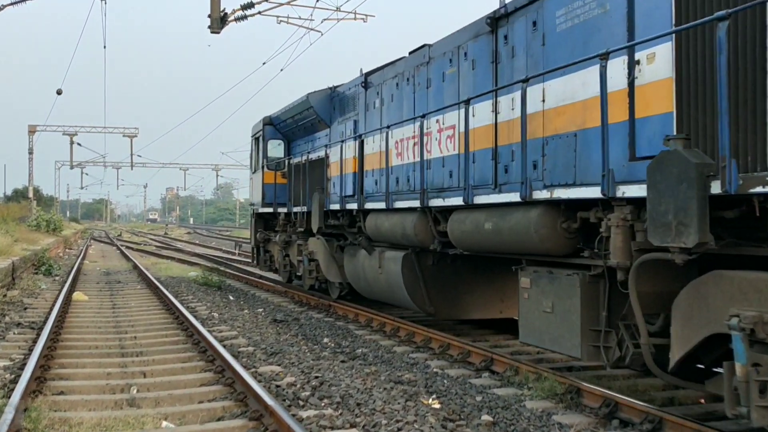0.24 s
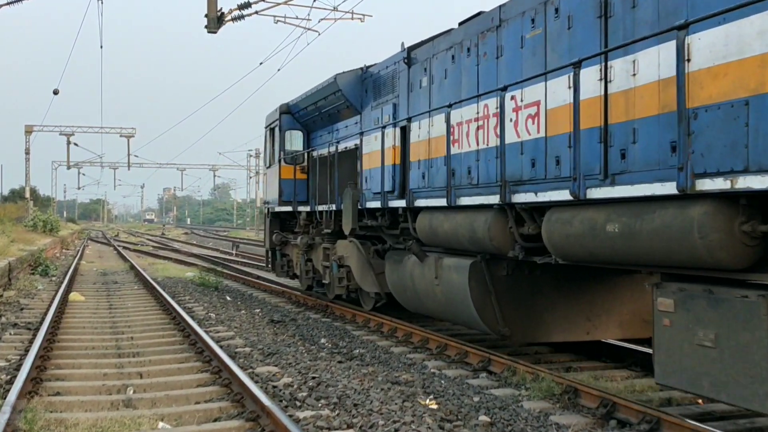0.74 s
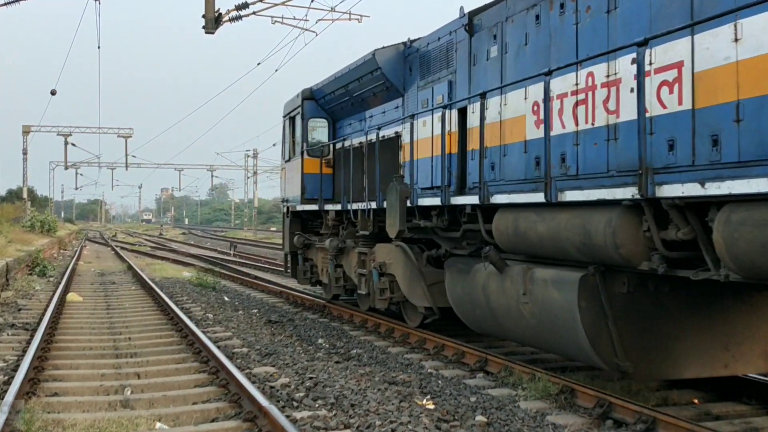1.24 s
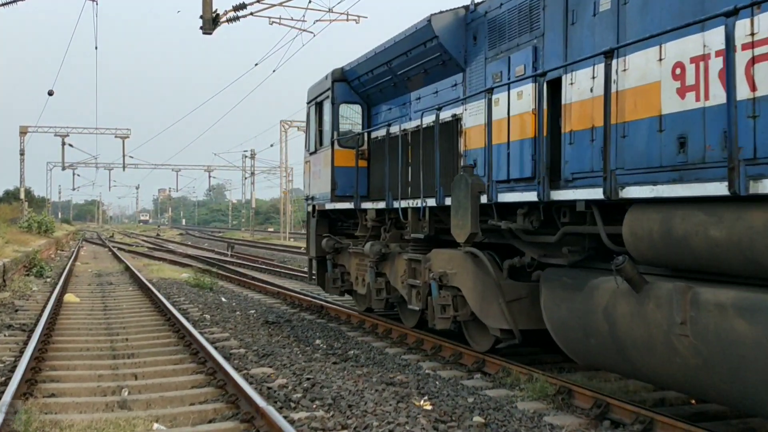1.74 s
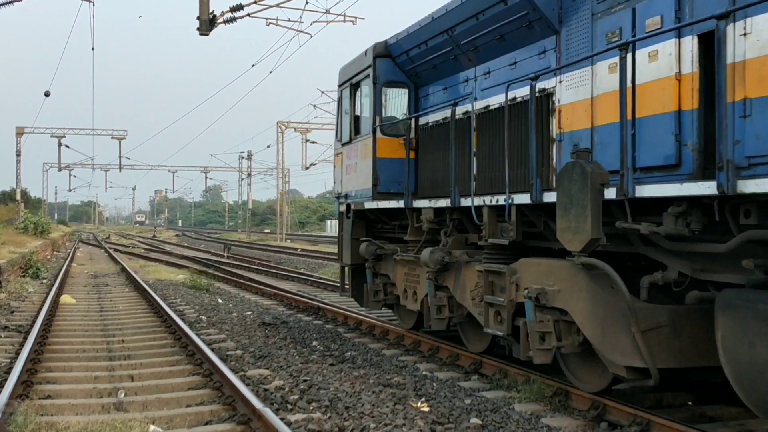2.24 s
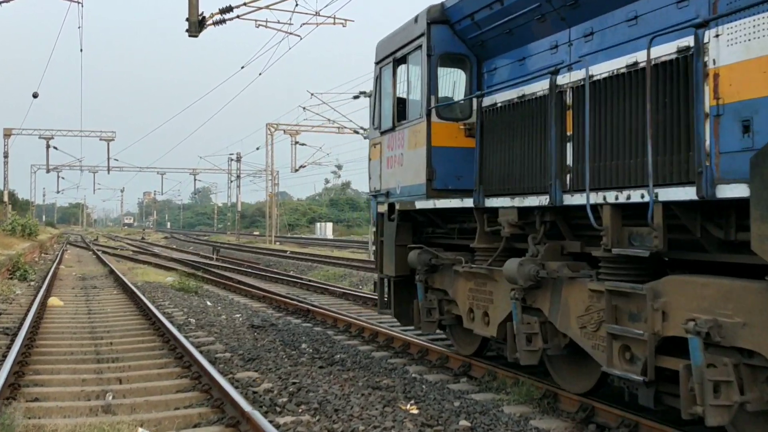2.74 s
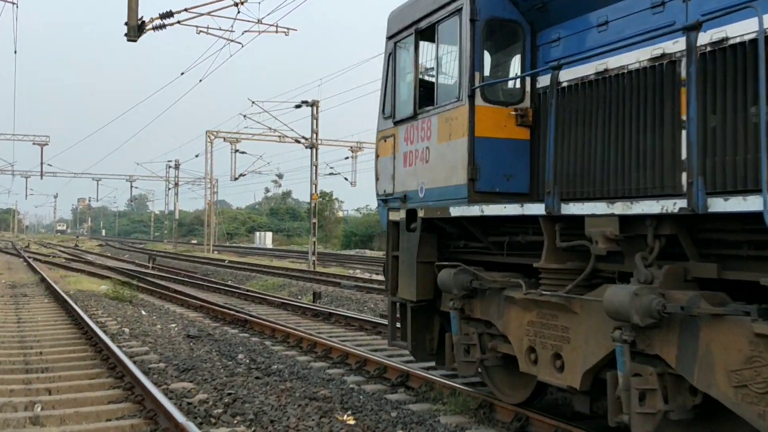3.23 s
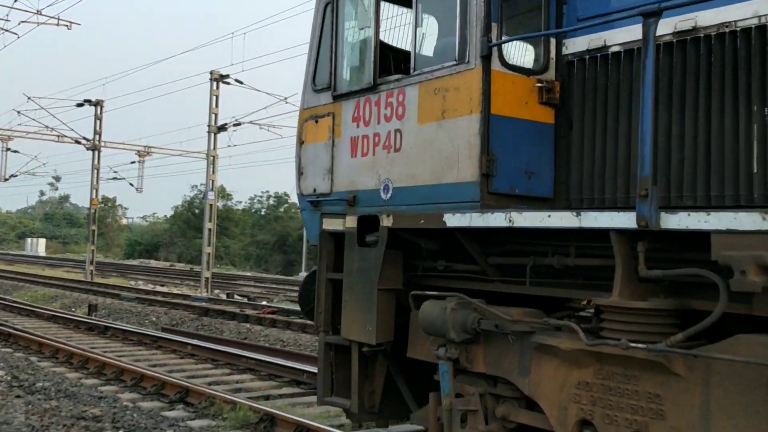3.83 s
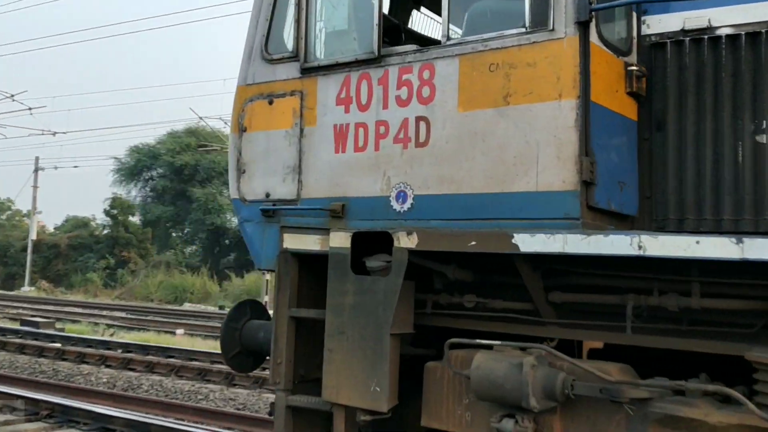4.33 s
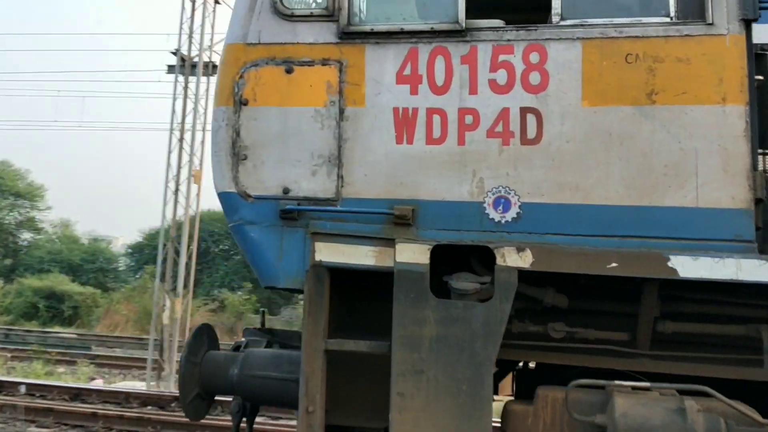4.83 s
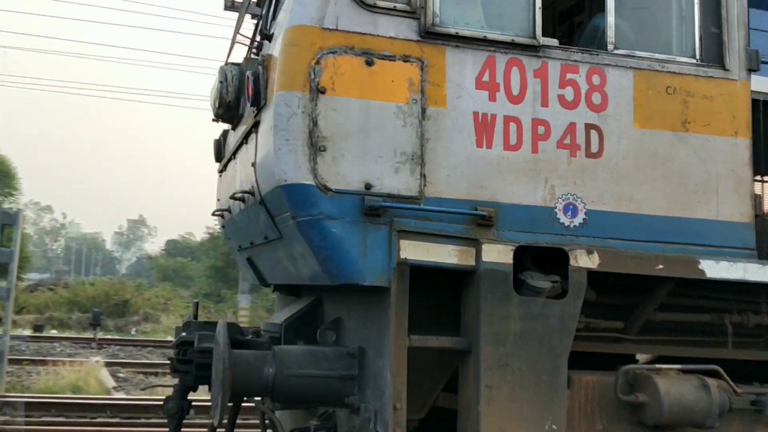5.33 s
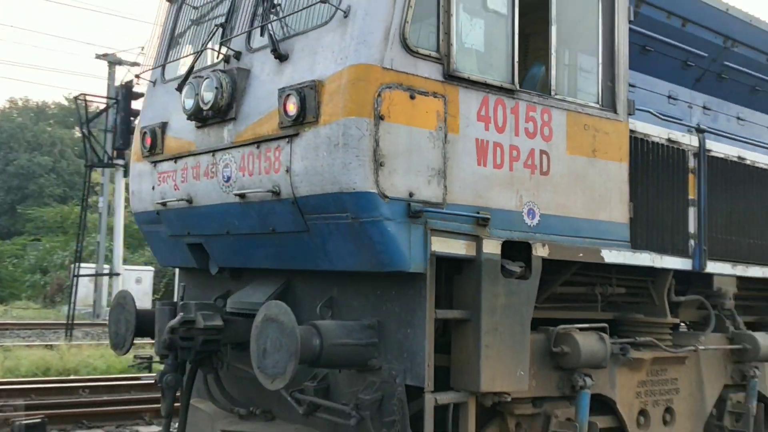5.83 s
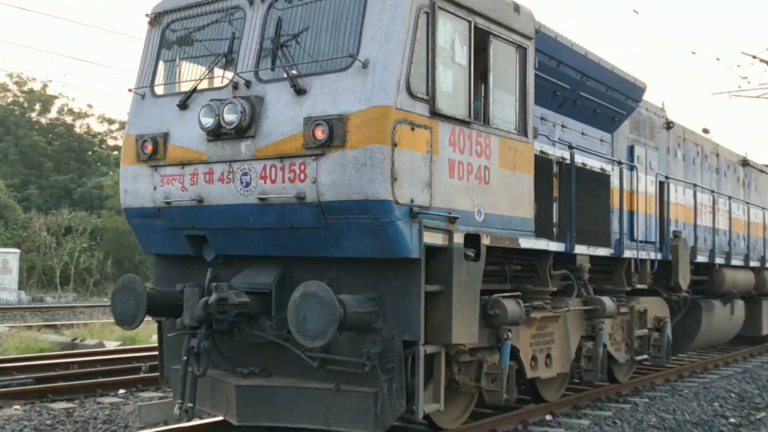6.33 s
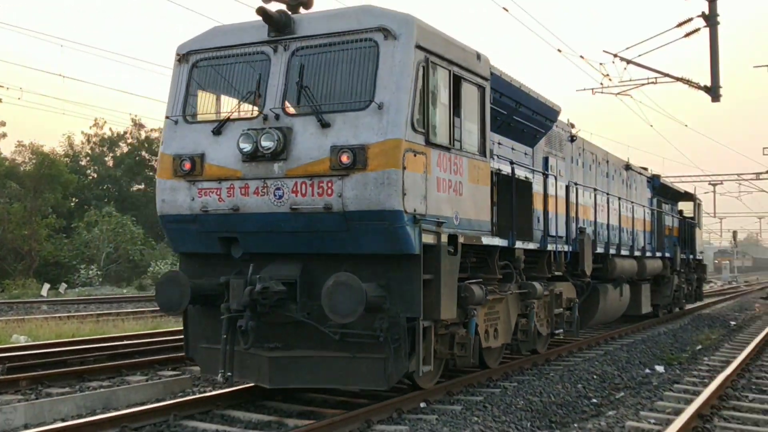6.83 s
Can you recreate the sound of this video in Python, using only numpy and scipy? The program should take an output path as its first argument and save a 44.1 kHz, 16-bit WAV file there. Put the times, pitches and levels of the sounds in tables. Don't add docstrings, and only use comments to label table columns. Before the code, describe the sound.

A loud two-note air horn is already sounding and stops after about half a second with a puff of air and yard echoes. A heavy diesel locomotive then rolls slowly past a close hand-held stereo microphone outdoors: throbbing exhaust, droning casing, high turbo whine and broad fan roar, strongest around two to three seconds. Wheels thud over a rail joint in two groups, then everything dulls and recedes.

```python
import sys
import numpy as np
from scipy import signal
from scipy.fft import rfft, irfft, next_fast_len
from scipy.io import wavfile
from scipy.ndimage import uniform_filter1d, map_coordinates

SR = 44100
rng = np.random.default_rng(int(sys.argv[2]) if len(sys.argv) > 2 else 0)


def ratio_of_db(decibels):
    return 10 ** (np.asarray(decibels, float) / 20)


def to_wav(s):
    ch = np.atleast_2d(s).T
    pcm = np.round(np.clip(ch, -1, 1) * 32767)
    wavfile.write(sys.argv[1], SR, pcm.astype(np.int16))


N = 311787

# time in seconds, level in dB.
BLOW = [
    (0, 5),
    (.5, -1),
    (.56, -4),
    (.66, -7.5),
    (.72, -30),
]
# time in seconds,
# fundamental in Hz.
LOW_HZ = [(0, 270.4), (.3, 270), (.5, 270.3), (.6, 273), (.72, 274)]
HIGH_HZ = [(0, 466.5), (.3, 465.8), (.5, 466), (.66, 468.5)]
LOW_TOP_DB = [-22.5, -21, -31.5, -32, -33, -35, -40.5, -58.5, -68.5, -52, -49, -57, -58, -68]
HIGH_TOP_DB = [-26.5, -27, -42, -38.5, -49, -48.5, -56, -58.5, -51.5, -49, -65.5, -50, -51]
# time in seconds, crankshaft turns per second.
SHAFT = [(0, 4.505), (1, 4.508), (2, 4.519), (3.3, 4.519), (4.5, 4.51), (7.07, 4.489)]
LOW_DROP = 2.44


def evened(x):
    return x / np.sqrt(np.mean(x ** 2) + 1e-20)


def read(points, hz):
    f, value = np.transpose(points)
    return np.interp(np.log(hz + 1), np.log(f + 1), value)


def curves(rows, t):
    s, *columns = np.transpose(rows)
    return [np.interp(t, s, c) for c in columns]


def drift(top_hz, count, size=N):
    low_pass = signal.butter(2, top_hz / 200)
    slow = signal.lfilter(*low_pass, rng.standard_normal((count, 3000)))
    at = np.arange(size) / SR * 400 + 100
    return np.array([np.interp(at, np.arange(len(row)), evened(row)) for row in slow])


def nulls(t, rows):
    return -sum(db * np.exp(-((t - s) / half) ** 2) for s, half, db in rows)


def abreast(t, db, from_s, until_s, approach_s, retreat_s):
    before = np.maximum(from_s - t, 0) / approach_s
    after = np.maximum(t - until_s, 0) / retreat_s
    return db - 10 * np.log10(1 + before ** 2 + after ** 2)


def duck_db(t):
    return -5.5 * np.clip(1 - (t - 0.547) / 0.1, 0, 1)


def ports(x):
    # time in seconds, delay in milliseconds.
    lag = [(0, 0.2965), (.9, 0.2866), (1.7, 0.256), (2.1, 0.3168), (4.9, 0.3408), (5.4, 0.095),
           (7.07, 0.053)]
    t = np.arange(N)
    late = curves(lag, t / SR)[0] * SR / 1000
    return np.array([x[0], map_coordinates(x[1], [t - late], order=3, mode="nearest")])


def hiss(level_db, patchy_db, size=1024, count=N):
    # frequency in Hz, likeness of the two ports from 0 to 1.
    likeness = [(60, 0.946), (200, 1), (600, 0.935), (1400, 0.418), (3000, 0.37), (6000, 0.062),
                (15000, .2)]
    t = np.arange(4 * count // size + 5) * size / 4 / SR
    hz = np.fft.rfftfreq(size, 1 / SR)[:, None]
    a, b, c, d, patches = rng.standard_normal((len(t), len(hz), 5)).T
    patches = uniform_filter1d(patches, size=12, axis=0)
    patches = evened(uniform_filter1d(patches, size=12, axis=1))
    same = np.clip(read(likeness, hz), 0, 1)
    left = a + 1j * b
    right = same * left + np.sqrt(1 - same ** 2) * (c + 1j * d)
    z = np.array([left, right]) * ratio_of_db(level_db(hz, t) + patchy_db * patches)
    out = signal.istft(z, nperseg=size, noverlap=size - size // 4)[1][:, :count]
    return np.pad(out, ((0, 0), (0, N - count)))


def band_db(points, hz, lo_hz, hi_hz):
    db = read(points, hz)
    inside = (hz > lo_hz) & (hz < hi_hz)
    return db - 10 * np.log10(np.sum(ratio_of_db(2 * db[inside])))


def yard(x):
    # frequency in Hz, decay time (t60) in seconds.
    decay = [(250, 1.11), (500, 0.705), (1000, 0.55), (2000, 1.3), (5000, 2.16)]
    taps = np.zeros((2, 2 * SR))
    at = np.arange(1500, 2 * SR - 20, 20) + rng.integers(0, 20, (2, (2 * SR - 1501) // 20))
    np.put_along_axis(taps, at, rng.choice([-1., 1.], at.shape), 1)
    hz, t, z = signal.stft(taps, SR, nperseg=256)
    fade_db = -60 * t / read(decay, hz)[:, None]
    tail = signal.istft(z * ratio_of_db(fade_db), SR, nperseg=256)[1]
    echoes = signal.fftconvolve(x[:, :SR], tail / np.linalg.norm(tail[0]), axes=1)
    return np.pad(echoes, ((0, 0), (0, N - echoes.shape[1])))


def bell(rows, pitch, top_db, dips, flutter_db, quiver, skew):
    n = round(rows[-1][0] * SR)
    t = np.arange(n) / SR
    first_db, pan_db = curves(rows, t)
    blow_db = curves(BLOW, t)[0]
    turns = np.cumsum(curves(pitch, t)[0]) / SR
    turns = turns + quiver * drift(12, count=1, size=n)[0] / 100
    low = [db + LOW_DROP * np.minimum(blow_db, 0) for db in top_db[:2]]
    high = [db + blow_db for db in top_db[2:]]
    out = np.zeros((2, N))
    for k, db in enumerate([first_db] + low + high, 1):
        db = db + nulls(t, [row[1:] for row in dips if round(row[0]) == k])
        waver = drift(8.1, count=4, size=n) * min(k / 4, 1)
        side_db = [[.5], [-.5]] * pan_db * (k == 1)
        phase = rng.random() - np.c_[[0, skew]] * (k == 1)
        angle = 2 * np.pi * (k * turns + phase) + .5 * waver[2:]
        out[:, :n] += ratio_of_db(db + 3.5 + side_db + flutter_db * waver[:2]) * np.sin(angle)
    out[:, :n] *= np.clip((t[-1] - t) / 0.025, 0, 1)
    return out


def horn():
    # time in seconds, fundamental in dB, left-right difference in dB.
    low_rows = [(0, -20.5, .5), (.2, -22, -4.5), (.27, -20.5, -3), (.36, -16.5, -2), (.45, -21.5, 2),
                (.53, -24.5, -0.5), (.64, -32, -2), (.69, -34, 2.5), (.72, -50, 0.5)]
    high_rows = [(0, -17, 6.7), (.12, -21.5, 7.1), (.22, -16, 1.24), (.33, -26, 10.8), (.38, -30, 2.04),
                 (.48, -18, 0.98), (.59, -21, 4.4), (.63, -32.5, 2.9), (.66, -55, 3)]
    # partial number, time in seconds, half width in seconds, depth in
    # dB.
    low_dips = [(2, 0.018, 0.11, 15.5), (2, 0.253, 0.052, 15), (3, .28, 0.044, 2.5), (3, .42, 0.0124, 6)]
    high_dips = [(2, 0.059, .03, 6), (2, 0.356, 0.076, 5), (2, 0.93, 0.026, 13), (3, 0.39, 0.069, 12)]
    bells = bell(low_rows, LOW_HZ, LOW_TOP_DB, low_dips, flutter_db=2.5, quiver=0.47, skew=0.034)
    bells = bells + bell(high_rows, HIGH_HZ, HIGH_TOP_DB, high_dips, flutter_db=3.0, quiver=0.55, skew=0.0)
    return bells + ratio_of_db(-9) * yard(bells)


def horn_air():
    # frequency in Hz, level in dB per Hz.
    puff_tone = [(2060, -36), (3500, -1.5), (4050, -41.5), (4260, -11), (5050, 1.5), (9850, -14),
                 (10700, -20), (13900, -4), (15800, -13.5)]
    rush_tone = [(900, -5.5), (2500, 0.5), (4000, -13), (6000, 2), (7200, -13.5), (9000, -36)]

    def air_db(hz, t):
        late = t - 0.4966
        swell_db = np.where(late < 0, -40 * (late / 0.044) ** 2, -269 * late)
        puff_db = np.maximum(-28 + swell_db, -73)
        late = t - 0.444
        rush_db = -33 + np.minimum(11.5 * late, -35 * late)
        spent_db = -380 * np.maximum(t - .8, 0)
        puff_db = puff_db + spent_db
        rush_db = np.maximum(rush_db + spent_db, -200)
        puff = ratio_of_db(2 * (band_db(puff_tone, hz, 9500, 16200) + puff_db + 2.0))
        rush = ratio_of_db(2 * (band_db(rush_tone, hz, 4500, 7500) + rush_db - 0.5))
        return 10 * np.log10(puff + rush)
    return hiss(air_db, patchy_db=2.0, size=256, count=SR)


def ahead():
    # multiple of the low bell, multiple of the high bell, level in dB.
    mixed = [(-1, 2, -39), (1, 1, -43.5), (2, 1, -43), (1, 2, -46.5), (3, 1, -53), (4, 1, -51.5)]
    doppler = 1.0135
    n = 3 * SR // 2
    t = np.arange(n) / SR
    low_hz, high_hz = LOW_HZ[1][1], HIGH_HZ[1][1]
    fade_db = -1.5 - 30.5 * np.maximum(t - 0.632, 0)
    tones = []
    for hz, top_db in ((low_hz, LOW_TOP_DB), (high_hz, HIGH_TOP_DB)):
        for k, db in enumerate(top_db, 2):
            if k * hz < 3000:
                thin_db = -10 * np.log10(1 + (2390 / (k * hz)) ** 4)
                tones.append((doppler * k * hz, db + fade_db + thin_db))
    fail_db = LOW_DROP * np.minimum(curves(BLOW, t)[0], 0)
    tones += [(round(a) * low_hz + round(b) * high_hz, db + fail_db) for a, b, db in mixed]
    out = np.zeros((2, N))
    for hz, db in tones:
        waver = drift(4.87, count=4, size=n)
        angle = 2 * np.pi * (hz * t + rng.random()) + .5 * waver[2:]
        out[:, :n] += ratio_of_db(db + 4 + 2.0 * waver[:2]) * np.sin(angle)
    return out


def joints():
    # start in seconds, thud in dB, thud pitch in Hz, thud t60 in seconds, rattle in dB.
    impacts = [(0.698, -26, 150.8, 0.15, -58), (0.718, -25.5, 333.8, 0.203, -36),
               (0.735, -26.5, 260.7, 0.185, -54), (1.201, -25.5, 123.5, 0.11, -32.5),
               (1.698, -16.5, 105.5, 0.076, -35), (1.741, -21, 171, 0.068, -54),
               (4.226, -17.5, 243, 0.094, -51), (4.241, -13, 226, 0.058, -38), (4.297, -13, 114, 0.05, -57),
               (4.725, -32, 178, 0.098, -36), (4.745, -20, 186.6, 0.113, -39),
               (4.766, -19, 95.4, 0.206, -56.5), (4.795, -25, 172.3, 0.224, -41),
               (4.8, -22, 87.9, 0.247, -59), (5.068, -24, 112.9, 0.192, -44.5),
               (5.222, -21.5, 94.5, 0.135, -31.5), (5.246, -13.5, 187, 0.05, -37.5),
               (5.258, -17, 274.8, 0.139, -37.5), (5.868, -39.5, 156, 0.13, -49.5)]
    # frequency in Hz, level in dB, t60 in seconds.
    modes = [(736.7, 13.5, 0.111), (880.5, 12.5, 0.086), (1142, -8.5, 0.16), (1333, -6.5, 0.86),
             (1850, -11.5, 0.088), (2160, -2, 0.1)]
    t = np.arange(SR // 2) / SR
    out = np.zeros((2, N))
    grit = signal.butter(2, [650, 2100], "bandpass", fs=SR)
    rattles = signal.lfilter(*grit, rng.standard_normal((len(impacts), 3, len(t))))
    for (s, thud_db, hz, t60, rattle_db), noise in zip(impacts, rattles):
        ring_db = rattle_db + (-6.5 if s > 3 else -27)
        body = np.sin(2 * np.pi * hz * t) + 0.182 * np.sin(2 * np.pi * 2.0 * hz * t)
        thud = ratio_of_db(thud_db - 60 * t / t60) * body
        rattle = ratio_of_db(rattle_db - 60 * (t / .12) ** 2) * evened(noise[0] + .7 * noise[1:])
        ring = sum(ratio_of_db(ring_db + db - 60 * t / ring_t60) * np.sin(2 * np.pi * f * t)
                   for f, db, ring_t60 in modes)
        hit = np.clip(t / 0.00306, 0, 1) * thud + np.clip(t / 0.0018, 0, 1) * rattle + ring
        spot = out[:, round(s * SR):][:, :len(t)]
        spot += hit
    return out


def whine(hz, db, flutter_db, flutter_hz, fuzz):
    waver = drift(flutter_hz, count=5)
    angle = 2 * np.pi * np.cumsum(hz) / SR + fuzz * waver[4] + .5 * waver[2:4]
    return ratio_of_db(db + 4.0 + flutter_db * waver[:2]) * np.sin(angle)


def rotors():
    # time in seconds, turbocharger in Hz, gear mesh in Hz, blower in Hz.
    speeds = [(0, 2538, 357, 3995), (1.5, 2547, 358, 3995), (3.8, 2563, 358, 3992),
              (5.2, 2558, 355.5, 3980), (7.07, 2554, 355, 3978)]
    # time in seconds, turbocharger level in dB.
    turbo_level = [(0, -45), (.7, -42), (1.5, -41), (1.61, -29.5), (1.72, -43.5), (2.05, -33.5), (2.6, -40),
                   (2.93, -37), (3.9, -41.5), (4.45, -44), (4.7, -41.5), (4.85, -59.5), (5.18, -48),
                   (5.9, -58.5), (6.15, -56), (7.07, -54.5)]
    # time in seconds, half width in seconds, depth in dB.
    turbo_dips = [(1.14, 0.03, 12.5), (1.3, 0.015, 8.5), (2.22, 0.019, 15.5), (2.51, 0.012, 11),
                  (2.7, 0.0285, 27), (2.79, 0.0294, 21.5), (3.06, 0.0193, 6.5), (4.13, 0.076, 12.5),
                  (4.33, 0.051, 14), (4.56, 0.0424, 14.5), (5.75, 0.045, 15.5), (6.02, 0.061, 3)]
    # multiple of the mesh, level in dB, abreast from and until in seconds.
    gears = [(2, -38, 1.605, 2.444), (2, -49, 6.06, 6.02), (3, -59.5, 6, 10), (4, -54, 6.5, 5.8),
             (6, -57.5, 5.75, 5.36)]
    # level in dB, abreast from, until, approach and retreat in seconds.
    blower_pass = (-55.5, 0.5, 5.5, -0.5, -5.5)
    upper_pass = (-53, 7, 7.5, -0.45, .5)
    t = np.arange(N) / SR
    turbo_hz, mesh_hz, blower_hz = curves(speeds, t)
    turns = np.cumsum(curves(SHAFT, t)[0]) / SR
    wobble_hz = 10.6 * np.cos(2 * np.pi * (turns + .36))
    turbo_db = curves(turbo_level, t)[0] + nulls(t, turbo_dips)
    out = whine(turbo_hz + wobble_hz, turbo_db, flutter_db=2.5, flutter_hz=16.9, fuzz=0.15)
    for k, *row in gears:
        gear_db = abreast(t, *row, approach_s=0.35, retreat_s=0.42)
        out += whine(round(k) * mesh_hz, gear_db, flutter_db=4.0, flutter_hz=10.05, fuzz=0.857)
    blower_db = abreast(t, *blower_pass) - 3.5 + nulls(t, [(4.0, 0.34, 6.2), (5.05, 0.26, 5.7)])
    out += whine(blower_hz, blower_db, flutter_db=2.5, flutter_hz=4.9, fuzz=0.94)
    upper_db = abreast(t, *upper_pass) - 11.5
    out += whine(np.full(N, 4865.), upper_db, flutter_db=6.5, flutter_hz=25, fuzz=1.0)
    return out


def roar():
    # frequency in Hz, level in dB per Hz.
    near = [(25, -32), (60, -18.5), (150, -10.5), (300, -14), (520, -13.5), (860, -19.5), (1340, -20),
            (2200, -20.5), (2900, -24.5), (4150, -34), (5100, -20), (8000, -40.5), (11500, -58),
            (14600, -43)]
    far = [(25, -8.5), (60, -31), (150, -9), (300, -13), (470, -16), (950, -23), (1380, -21), (1700, -28.5),
           (2100, -24), (4200, -40), (5200, -33), (7500, -48), (11800, -74.5), (14600, -60.5)]
    # level in dB, abreast from, until, approach and retreat in seconds.
    wheels_pass = (-33, 2.0623, 3.0, 1.0, 2.5)
    clatter_pass = (-38.5, 1.5, 3.5, 1.0, 1.0)
    fans_pass = (-39, 0.63, 3, 0.35, 0.6645)
    grilles_pass = (-57, 0.25, 2.83, 0.66, 0.4844)

    def level_db(hz, t):
        away = np.clip((t - 4.3 + 0.56 * (hz > 7000)) / 1.03, 0, 1)

        def toned(db, lo_hz, hi_hz):
            near_db = band_db(near, hz, lo_hz, hi_hz)
            return db + (1 - away) * near_db + away * band_db(far, hz, lo_hz, hi_hz)
        clear_db = -5 * np.clip((t - 5.8) / 0.094, 0, 1)
        wheels_db = abreast(t, *wheels_pass) + duck_db(t) + clear_db
        grilles_db = 10 * np.log10(ratio_of_db(2 * abreast(t, *grilles_pass)) + ratio_of_db(2 * -77))
        low = toned(wheels_db, 120, 450)
        mid = toned(abreast(t, *clatter_pass), 1000, 2300)
        high = toned(abreast(t, *fans_pass), 4500, 7000)
        air = toned(grilles_db, 13000, 15500)
        high = high + (air - high) * np.clip((hz - 7000) / 2500, 0, 1)
        up = np.clip((hz - 500) / 450, 0, 1)
        top = np.clip((hz - 2800) / 1500, 0, 1)
        return (1 - up) * low + up * (1 - top) * mid + top * high + 1.217
    return hiss(level_db, patchy_db=2.0)


def casing():
    # centre in Hz, width in Hz, level in dB.
    resonances = [(665.7, 118.6, 0), (704.8, 62.7, -3), (759, 54, -4.5)]
    casing_pass = (-32.5, 1.78, 2.5, -0.92, 2.09)

    def drone_db(hz, t):
        power = sum(ratio_of_db(2 * db) / (1 + (2 * (hz - f) / width) ** 4) for f, width, db in resonances)
        cab_db = nulls(t, [(4.97, 0.233, 2.5)])
        return 10 * np.log10(power / power.sum()) + abreast(t, *casing_pass) + cab_db
    return hiss(drone_db, patchy_db=2.0, size=2048)


def exhaust():
    multiples = [8, 15, 16, 17, 18, 19, 20, 21, 22, 23, 24, 31, 37, 40]
    multiples_db = [-15, -7, -5, 0, -10, -6, -12, -2, -14, -3, -14, -15, -15, -13]
    stack_pass = (-34.5, 1.9835, 2.5, 0.48, 1.6454)
    t = np.arange(N) / SR
    order, db = np.c_[multiples], np.c_[multiples_db]
    turns = np.cumsum(curves(SHAFT, t)[0]) / SR
    spread = -.16 + .578 * (order - 17) - .055 * (order - 17) ** 2 + .05 * (order % 2 == 0)
    level = ratio_of_db(db + .8 * drift(1.5, count=len(order)))
    beat = level * np.cos(2 * np.pi * (order * turns + spread))
    tail_db = -4 * np.maximum(t - 5.75, 0)
    return ratio_of_db(abreast(t, *stack_pass) + .5 * duck_db(t) + tail_db) * evened(beat.sum(0))


def scene():
    sided = horn() + horn_air() + ahead() + joints() + rotors() + roar() + casing()
    return exhaust() + ports(sided)


def band_limit(x):
    return signal.sosfilt(signal.butter(12, 15970, fs=SR, output="sos"), x)


def record(dry):
    # frequency in Hz, left-right difference in dB.
    lean = [(60, 1.5), (150, -0.5), (380, 0.5), (950, 0.5), (2380, 3), (5980, 2.5), (15000, -4.5)]
    knee, ceiling = .6, .83
    size = next_fast_len(N)
    lean_db = read(lean, np.fft.rfftfreq(size, 1 / SR)) * [[.5], [-.5]]
    x = irfft(rfft(dry, size) * ratio_of_db(lean_db), size)[:, :N]
    over = np.maximum(abs(x) - knee, 0)
    room = ceiling - knee
    x = x - np.sign(x) * (over - room * np.tanh(over / room))
    return band_limit(x)


dry = scene()
out = record(dry)
to_wav(out)
```